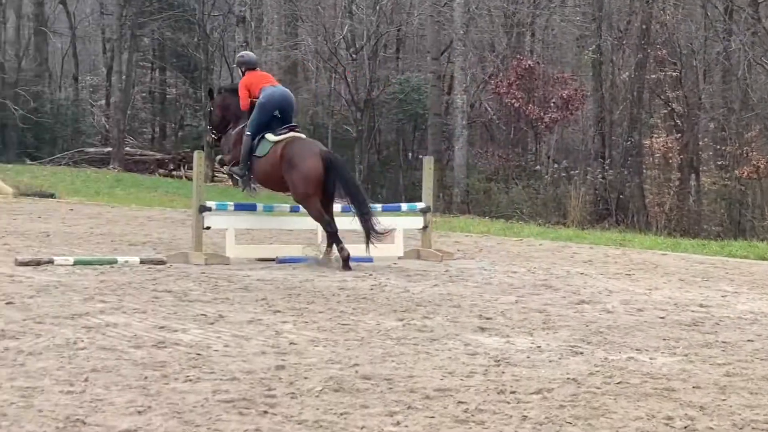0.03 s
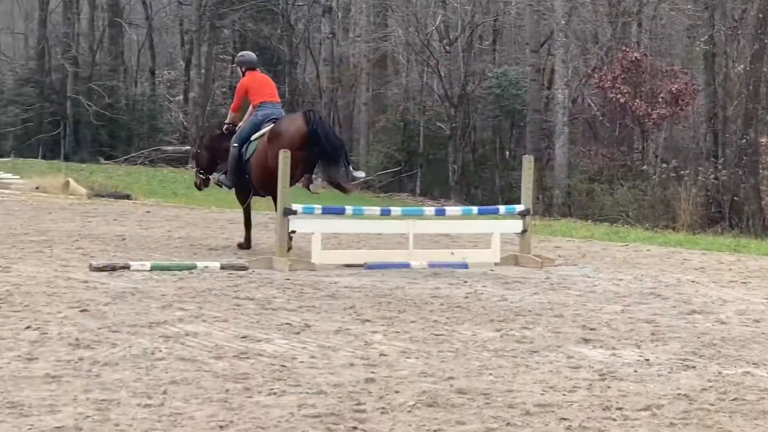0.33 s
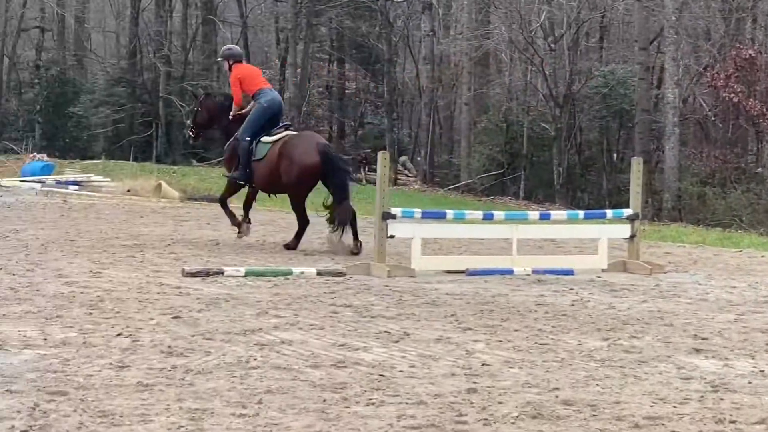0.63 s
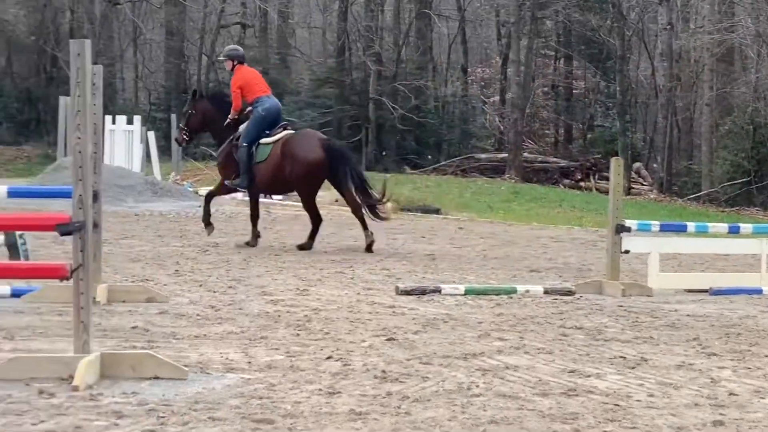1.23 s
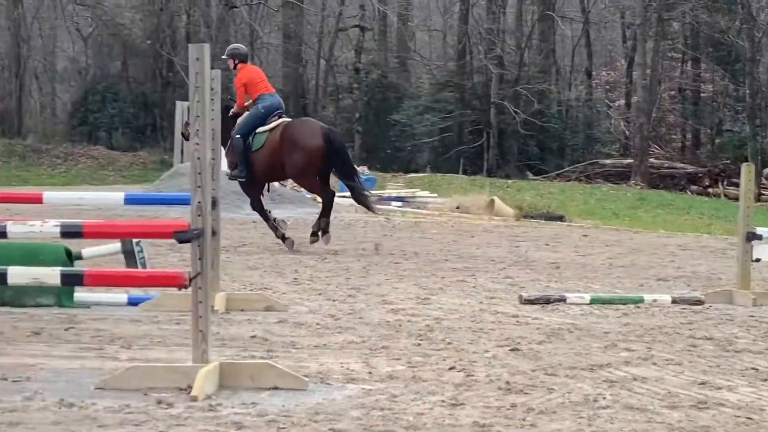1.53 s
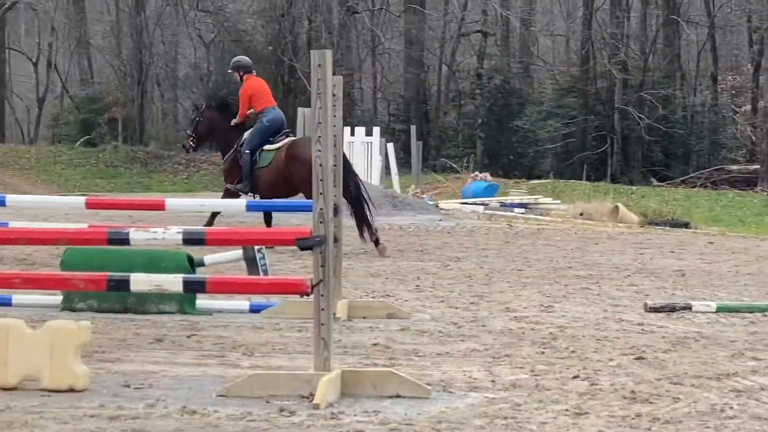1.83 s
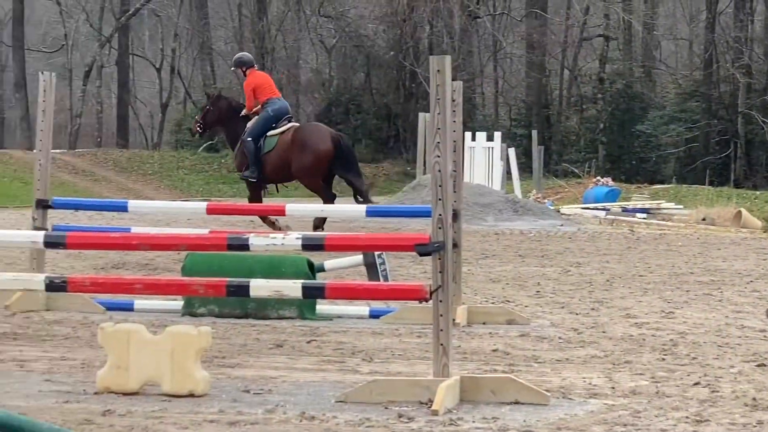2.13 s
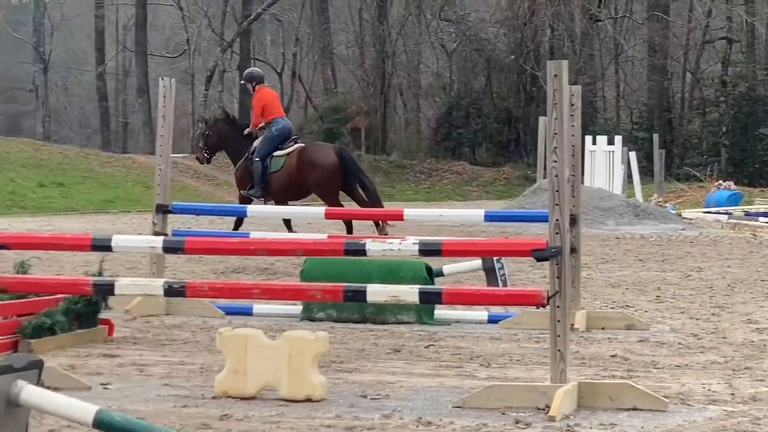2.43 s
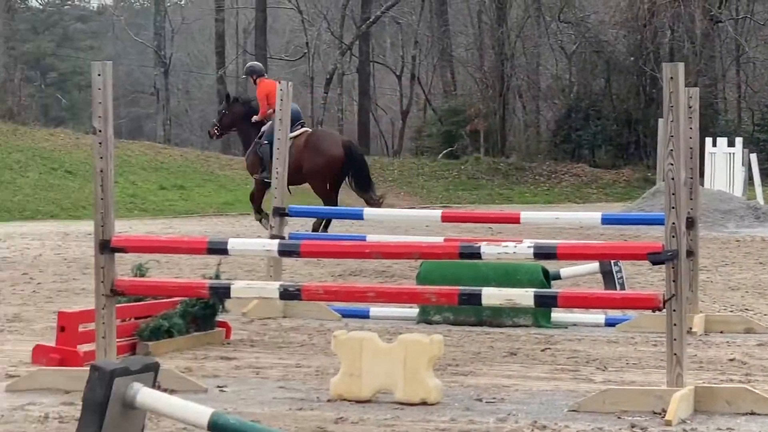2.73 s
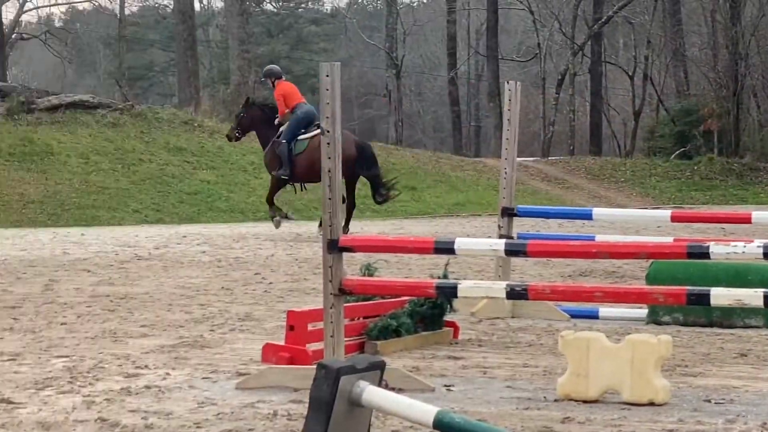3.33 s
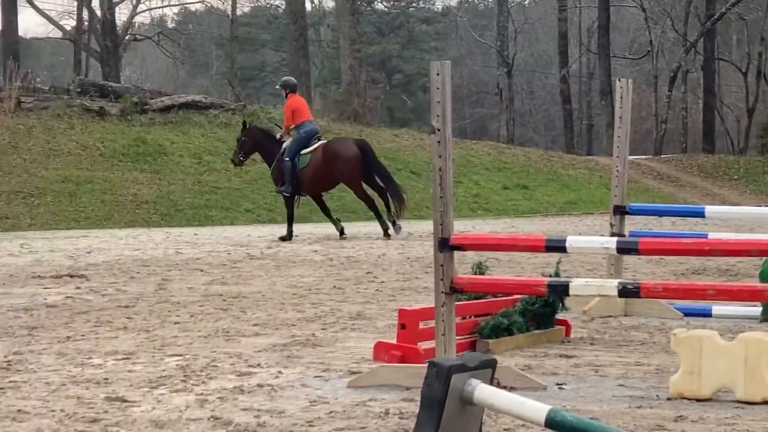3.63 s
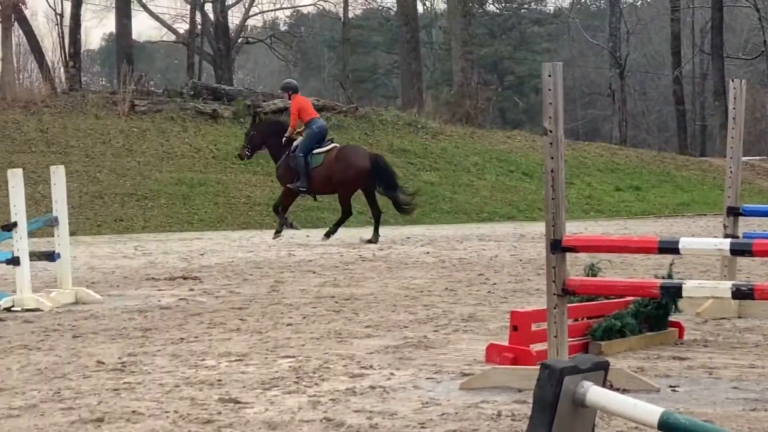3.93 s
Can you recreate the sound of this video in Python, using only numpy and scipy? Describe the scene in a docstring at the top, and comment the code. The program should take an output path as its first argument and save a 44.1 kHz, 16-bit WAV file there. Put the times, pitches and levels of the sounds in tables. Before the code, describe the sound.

Soft hoofbeats and small ticks of grit follow a hollow wooden knock as a horse moves off over sand. Low outdoor rumble and a far engine continue throughout, with one loud, hollow tap near the microphone late on.

```python
"""Sand riding arena by a wood

A horse canters away: dull hoof thuds in the sand, a few small ticks and a spray of grit.
Behind it a distant engine hums over a low rumble and the rush of far traffic or wind.
A hollow wooden knock opens the scene, and a thin high call, probably a bird, sounds once.
Near the end comes one loud, round pop close by, like a tap on a small hollow case."""
import sys
import numpy as np
from scipy import signal
from scipy.fft import rfft, irfft
from scipy.io import wavfile

SR = 44100
rng = np.random.default_rng(int(sys.argv[2]) if len(sys.argv) > 2 else 0)


def store_pcm(level_fs):
    """Save levels as 16-bit WAV."""
    pcm = np.round(np.clip(level_fs, -1, 1) * 32767).astype(np.int16)
    wavfile.write(sys.argv[1], SR, np.atleast_2d(pcm).T)


N = 176400
T = np.arange(N) / SR


def from_db(db):
    """Decibels to gain."""
    return 10 ** (np.asarray(db) / 20)


def rms_one(x):
    """Scale to an rms of 1."""
    return x / np.sqrt(np.mean(x ** 2) + 1e-20)


def peak_one(x):
    """Scale to a peak of 1."""
    return x / np.max(np.abs(x))


def in_time(rows):
    """An automation curve: (time, value) rows joined by straight lines."""
    return np.interp(T, *np.transpose(rows))


def at_hz(rows, hz):
    """Read (frequency, value) rows on a log-frequency axis."""
    freqs, values = np.transpose(rows)
    return np.interp(np.log(hz), np.log(freqs), values)


def bell(hz, centre_hz, octaves):
    """A bell curve of height 1 on a log-frequency axis."""
    return np.exp(-(np.log2(hz / centre_hz) / octaves) ** 2)


def pan(db):
    """Channel gains for a left-minus-right level."""
    return from_db(np.array([[.5], [-.5]]) * db)


def butter(x, hz, kind, order=2):
    """Causal Butterworth filter."""
    sos = signal.butter(order, np.clip(hz, 10, .45 * SR), kind, fs=SR, output="sos")
    return signal.sosfilt(sos, x + 1e-18)


def drift(rate_hz):
    """Smooth random modulation with an rms of 1, rolling off above rate_hz."""
    hop, run_in = 40, 2000
    pole = np.exp(-2 * np.pi * hop * rate_hz / SR)
    white = rng.standard_normal(N // hop + run_in + 2)
    slow = signal.lfilter([1], [1, -2 * pole, pole * pole], white)[run_in:]
    return np.interp(np.arange(N) / hop, np.arange(len(slow)), rms_one(slow))


def click(start):
    """A unit impulse at a time in seconds."""
    return 1.0 * (np.arange(N) == max(int(start * SR), 0))


def ring(x, hz, t60):
    """A resonator: a unit click sets off a sine that falls 60 dB in t60 seconds."""
    pole, angle = from_db(-60 / (t60 * SR)), 2 * np.pi * hz / SR
    return signal.lfilter([0, np.sin(angle)], [1, -2 * pole * np.cos(angle), pole * pole], x + 1e-18)


# Stereo width of the background noise: (frequency [Hz], left-right correlation [-1..1])
NOISE_CORRELATION = [(60, 0.99), (200, 0.97), (300, 0.87), (420, 0.65), (600, -0.38), (850, -0.43),
                     (1250, 0.13), (1700, 0.71), (2200, 1), (3300, .88), (5500, 1), (7600, .99),
                     (8500, -0.57), (9600, 0.26), (10800, 0.57)]
# Balance of the background noise: (frequency [Hz], left minus right [dB])
NOISE_BALANCE = [(60, -2), (220, -0.1), (420, 0.1), (800, -3), (1000, -0.5), (1300, -3), (2200, 0),
                 (11000, 0)]


def noise_bands(spectrum, flicker_db, count):
    """Adjoining bands of flickering stereo noise: (centres, bands), the bands summing to rms 1."""
    edges = np.geomspace(spectrum[0][0], spectrum[-1][0], count + 1)
    centres = np.sqrt(edges[1:] * edges[:-1])
    white = rng.standard_normal((2, 2, N))
    bands = []
    for k, hz in enumerate(centres):
        mid, side = butter(white[k % 2], edges[k:k + 2], "band", order=3)
        alike = np.clip(at_hz(NOISE_CORRELATION, hz), -1, 1)
        stereo = np.sqrt(1 + alike) * mid + np.sqrt(1 - alike) * side * [[1], [-1]]
        gain = from_db(at_hz(spectrum, hz) + flicker_db * drift(17.6))
        bands.append(gain * pan(at_hz(NOISE_BALANCE, hz)) * stereo)
    return centres, np.array(bands) / np.std(sum(bands))


# Tone of the hiss: (frequency [Hz], relative level [dB])
HISS_SPECTRUM = [(1800, -0.5), (2300, 0), (3200, -4), (4500, -7), (7500, -7.5), (8600, -10), (10300, -13.5),
                 (11800, -23)]


def hiss():
    """A faint high hiss, near-mono below 8 kHz and wide above."""
    _, bands = noise_bands(HISS_SPECTRUM, flicker_db=1.0, count=20)
    return from_db(-70.5) * bands.sum(axis=0)


# Tone of the rumble: (frequency [Hz], relative level [dB])
RUMBLE_SPECTRUM = [(22, -45), (30, -36), (40, -9.5), (52, -8), (86, 0.5), (118, -3.5), (150, -11.5),
                   (187, -3), (240, -13.5), (306, -23), (400, -23), (480, -33)]
# Low-shelf ride on the sub-bass: (time [s], gain [dB])
SUB_RIDE = [(0, -3), (.35, 0), (.7, -2), (1.3, -4), (1.7, 0), (2.4, -2.5), (3.1, -4), (4, 8.5)]


def rumble(shelf_hz=38):
    """Low outdoor rumble whose deepest part slowly heaves."""
    centres, bands = noise_bands(RUMBLE_SPECTRUM, flicker_db=1.6, count=13)
    sub_db = in_time(SUB_RIDE)
    heaving = sum(band * from_db(sub_db / (1 + (hz / shelf_hz) ** 4)) for hz, band in zip(centres, bands))
    return from_db(-45.5) * heaving


# Tone of the rush: (frequency [Hz], relative level [dB])
RUSH_SPECTRUM = [(400, -4.5), (520, -7.5), (640, -4), (800, -1), (1000, -5), (1250, -11.5), (1600, -18.5),
                 (2200, -28)]
# EQ ride on its body: (time [s], gain [dB])
RUSH_BODY_RIDE = [(0, 1.5), (1.2, -0.5), (2.3, -0.5), (3.3, 4), (4, 9)]
# EQ ride on its top: (time [s], gain [dB])
RUSH_TOP_RIDE = [(0, 1), (1.2, 1), (2.3, 0), (3.2, 0.5), (4, -0.5)]


def rush(body_hz=600, top_hz=1100):
    """Far traffic or wind: a wide rush that grows and darkens as its body swells near the end."""
    body_db, top_db = in_time(RUSH_BODY_RIDE), in_time(RUSH_TOP_RIDE)
    out = 0
    for hz, band in zip(*noise_bands(RUSH_SPECTRUM, flicker_db=1.5, count=12)):
        eq_db = body_db * bell(hz, body_hz, octaves=0.46) + top_db * bell(hz, top_hz, octaves=0.37)
        out = out + from_db(eq_db) * band
    return from_db(-55.5) * out


# Engine speed: (time [s], firing rate [Hz])
FIRING_RATE = [(0, 47.21), (.6, 46.68), (1.2, 46.63), (2, 45.92), (2.7, 46.24), (3.3, 45.61), (4, 45.77)]
# Steady upper tones: (order [x firing rate], level [dB])
STEADY_ORDERS = [(4, -54.5), (5, -66.5)]
# Throb at order 1.5: (time [s], level [dB])
THROB_RIDE = [(0, -45.5), (.7, -60), (1.3, -54), (1.8, -48.5), (2.4, -49), (3.2, -55), (4, -50)]
# Boom at order 2: (time [s], level [dB])
BOOM_RIDE = [(0, -40), (.4, -56.5), (.9, -64), (1.9, -58), (2.15, -46), (2.9, -42.5), (3.4, -45),
             (4, -45.5)]
# Drone at order 3: (time [s], level [dB])
DRONE_RIDE = [(0, -50), (.8, -48.5), (1.3, -51.5), (2.2, -46), (2.7, -50.5), (3.3, -51.5), (4, -52.5)]


def engine(wander=0.0068, flutter_db=0.5, smear_rad=0.47):
    """Only the low orders of the firing pulses carry this far; each flutters in the moving air."""
    cycles = rng.random() + np.cumsum(in_time(FIRING_RATE) * (1 + wander * drift(3.47))) / SR
    moving_orders = [(1.5, in_time(THROB_RIDE)), (2, in_time(BOOM_RIDE)), (3, in_time(DRONE_RIDE))]
    hum = 0
    for order, db in list(STEADY_ORDERS) + moving_orders:
        gain = np.sqrt(2) * from_db(db + flutter_db * drift(6.4))
        hum = hum + gain * np.sin(smear_rad * drift(4.1) - 2 * np.pi * order * cycles)
    return pan(db=-1.3) * hum


# Placement of the far sounds: (frequency [Hz], right-channel phase lag [rad])
RIGHT_LAG = [(40, 0.15), (180, 0.56), (320, 0.36), (430, 0.72), (600, 0.052)]


def from_the_left(far):
    """Low, far sound reaches the right side a little later."""
    left, right = far
    bin_hz = np.arange(N + 1) * SR / (2 * N)
    lag = np.exp(-1j * at_hz(RIGHT_LAG, bin_hz + 1))
    mirrored = np.r_[right, right[::-1]]  # keeps the end from wrapping into the start
    return np.array([left, irfft(rfft(mirrored) * lag)[:N]])


# Notes of the call: (time [s], length [s], level [dB], pitch [Hz])
BIRD_NOTES = [(2.140, 0.12, -69.5, 7998), (2.253, 0.048, -69, 7860), (2.362, 0.098, -73, 7990)]


def bird(trill_hz=41.6, depth_hz=54.6):
    """Thin notes with a quick trill, blurred differently on each side by the trees."""
    blur = 0.795 * np.array([drift(88), drift(89)])
    bend_hz = depth_hz * (np.sin(2 * np.pi * trill_hz * T) + blur)
    out = 0
    for start, length, db, hz in BIRD_NOTES:
        progress = np.clip((T - start) / length, 0, 1)
        envelope = np.sqrt(np.maximum(np.sin(np.pi * progress), 0))
        out = out + from_db(db) * envelope * np.sin(2 * np.pi * np.cumsum(hz + bend_hz, axis=1) / SR)
    return out


# Blows of the opening knock: (time [s], drive [dB], grit relative to the click [dB], colour centre [Hz])
RAIL_BLOWS = [(.0005, -32, -24.5, 620), (0.0297, -35.5, -21, 1100), (0.0344, -31, -33, 327)]
# Resonances of the hollow wood: (frequency [Hz], gain [dB], decay to -60 dB [s])
RAIL_MODES = [(173, -9, 0.095), (250.5, 0.5, 0.24), (351.6, -0.5, 0.15), (396, -8.5, 0.1), (481, -9, 0.2),
              (618, -8, 0.062), (750, -16, 0.11), (900, -20, 0.18), (968, -18.5, 0.16), (1390, -12, 0.047)]


def knocks(grit_t60=0.075, colour_depth_db=13):
    """Gritty blows, as on a wooden rail, each favouring other modes; a dull bump backs the first."""
    bump = from_db(-19) * peak_one(butter(click(0.00079), [107, 275], "band"))
    wood = 0
    for start, db, grit_db, centre_hz in RAIL_BLOWS:
        envelope = (T >= start) * from_db(-60 * np.abs(T - start) / grit_t60)
        grit = from_db(grit_db) * envelope * rng.standard_normal(N)
        blow = from_db(db) * (click(start) + grit)
        for k, (hz, mode_db, t60) in enumerate(RAIL_MODES):
            colour_db = colour_depth_db * (bell(hz, centre_hz, octaves=0.88) - 1)
            wood = wood + (-1) ** k * from_db(mode_db + colour_db) * ring(blow, hz, t60)
    return bump + wood


def case_tap(soft_hz, start=3.346):
    """One soft tap rings a heavily damped hollow and thumps the case, with a faint bright edge."""
    impulse = click(start)
    tap = butter(impulse, soft_hz, "low", order=3)
    hollow = peak_one(butter(tap, [560, 912], "band", order=3))
    tail = from_db(-12) * peak_one(ring(hollow, hz=580, t60=0.016))
    thump = from_db(-19) * peak_one(butter(tap, [109, 400], "band", order=4))
    edge = from_db(-48) * peak_one(butter(impulse, [2250, 2400], "band", order=1))
    return from_db(-4.5) * (hollow - tail) + thump + edge


def pop(left_lag_s=0.00024):
    """The close tap reaches the right side first and is a little brighter on the left."""
    left = np.interp(T - left_lag_s, T, case_tap(soft_hz=1500))
    return np.array([left, case_tap(soft_hz=1240)])


# Ticks of grit: (time [s], peak level [dB], centre [Hz], half-width [octaves], decay to -60 dB [s])
GRIT_TICKS = [(.004, -41.5, 1900, 0.66, 0.053), (.009, -38.5, 2100, 0.25, 0.043),
              (0.014, -46.5, 3600, 1, 0.0097), (0.028, -42.5, 1600, 0.44, 0.055),
              (0.03, -55, 7000, .6, .008), (0.076, -50.5, 1770, 0.24, 0.045), (.107, -58, 2250, .2, .03),
              (0.2425, -59, 7460, 0.44, 0.013), (0.2606, -51, 5400, 0.46, .005),
              (.388, -57.5, 4000, 0.15, 0.02), (0.393, -54, 2780, 0.17, 0.027), (.543, -52, 2800, .5, .015),
              (.599, -53.5, 2660, 0.25, 0.022), (0.5994, -50, 6600, 0.4, 0.0084)]


def grit_ticks():
    """Flying grit: tiny bursts of band-passed noise that die at once."""
    out = 0
    for start, db, hz, octaves, t60 in GRIT_TICKS:
        envelope = (T >= start) * from_db(-60 * np.clip((T - start) / t60, 0, 2))
        burst = envelope * rng.standard_normal(N)
        out = out + from_db(db) * peak_one(butter(burst, [hz / 2 ** octaves, hz * 2 ** octaves], "band"))
    return out


def sand_spray(peak_s=0.26, spread_s=0.066, grains_per_s=1200):
    """A short shower of sand grains as the horse lands."""
    grains = rng.standard_normal(N) * (rng.random(N) < grains_per_s / SR)
    envelope = np.exp(-((T - peak_s) / spread_s) ** 2)
    return from_db(-74) * envelope * rms_one(butter(grains, [4150, 9800], "band", order=4))


# Hoof thuds in the sand: (time [s], peak level [dB], pitch [Hz])
HOOF_FALLS = [(.265, -26, 228), (.600, -32.5, 315), (0.679, -37.5, 220), (.700, -35, 183),
              (1.584, -39, 109), (1.808, -38, 90), (1.827, -33.5, 301), (1.844, -37, 85), (2.264, -38, 201),
              (2.393, -36, 260), (2.51, -39.5, 228), (2.852, -46, 216), (3.545, -40.5, 313)]


def hooves(t60=0.026, push_hz=134, soft_hz=450):
    """Each hoof is a soft contact: a short dull ring with a quieter low push, muffled by the sand."""
    out = 0
    for start, db, hz in HOOF_FALLS:
        contact = click(start)
        thud = ring(contact, hz, t60) + from_db(-18) * ring(contact, push_hz, t60)
        muffled = butter(thud, soft_hz, "low", order=3)
        out = out + from_db(db) * peak_one(butter(muffled, 65, "high"))
    return out


def scene():
    """The mix: background, horse and one-off sounds."""
    background = from_the_left(rumble() + rush() + hiss() + engine())
    horse = hooves() + grit_ticks() + sand_spray()
    return background + horse + knocks() + bird() + pop()


def record(dry):
    """A steep high cut on the whole mix."""
    cutoff_hz = 12200
    return signal.sosfilt(signal.ellip(10, .1, 80, cutoff_hz, fs=SR, output="sos"), dry)


dry = scene()
out = record(dry)
store_pcm(out)
```